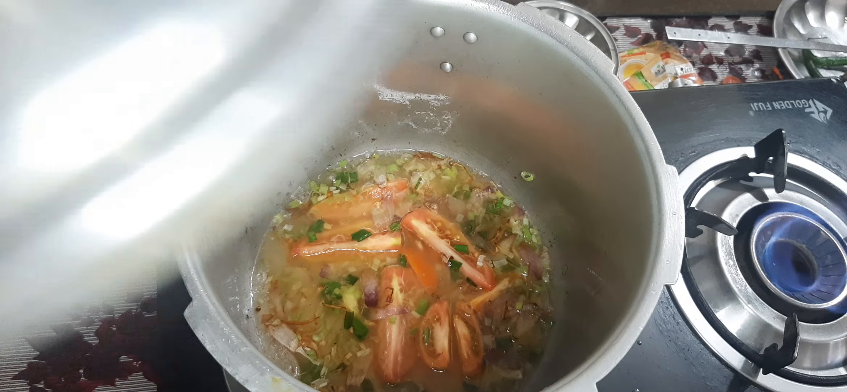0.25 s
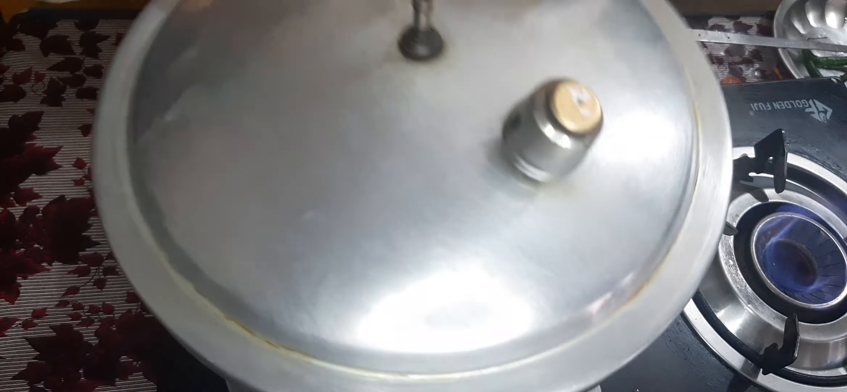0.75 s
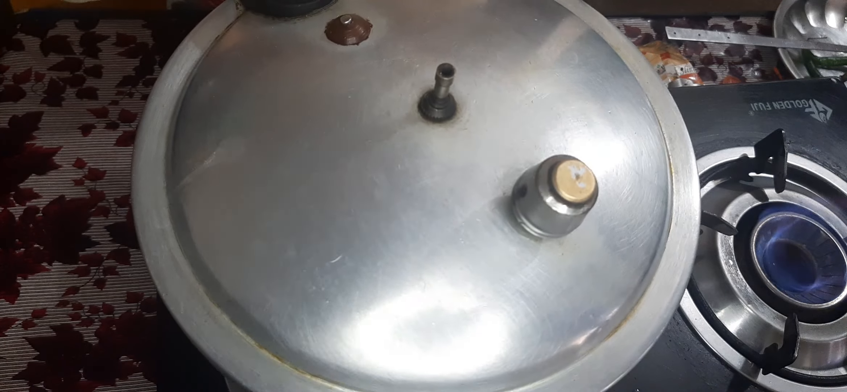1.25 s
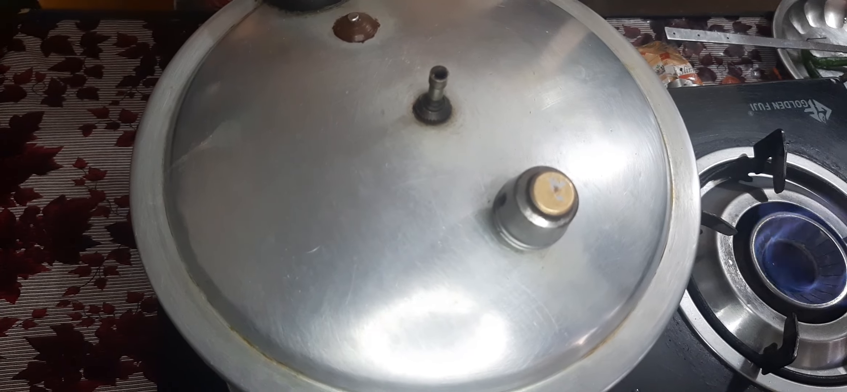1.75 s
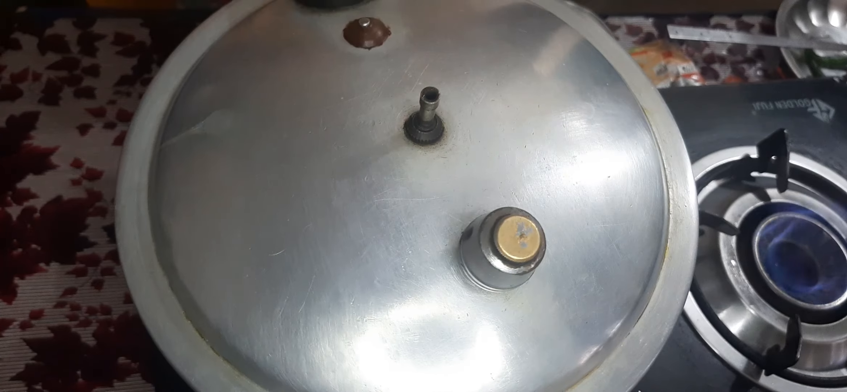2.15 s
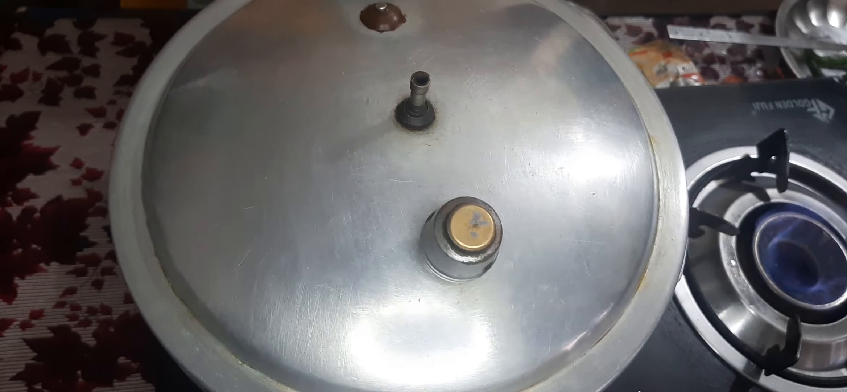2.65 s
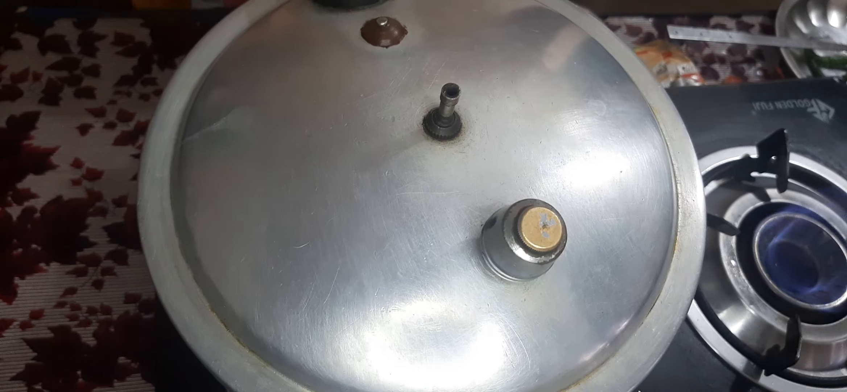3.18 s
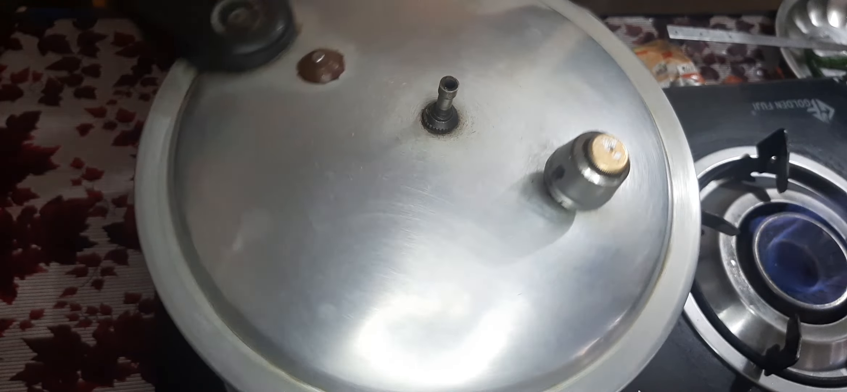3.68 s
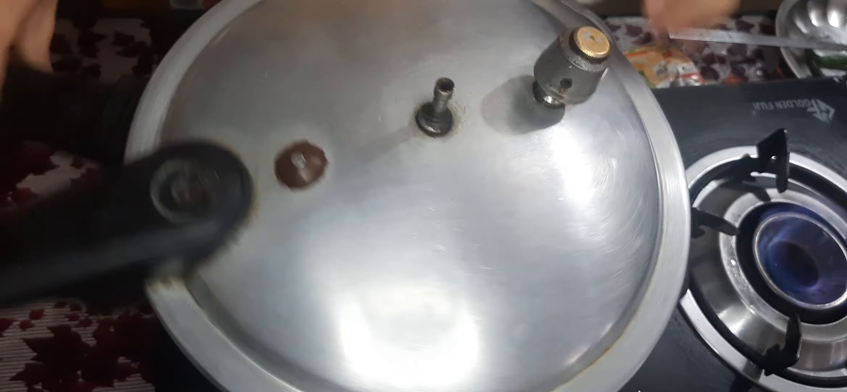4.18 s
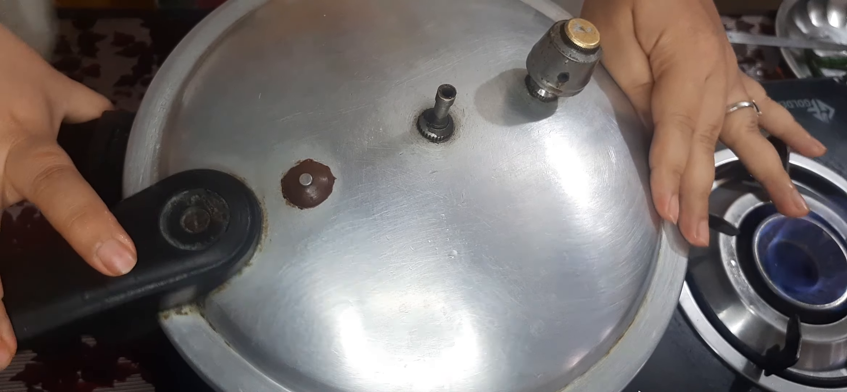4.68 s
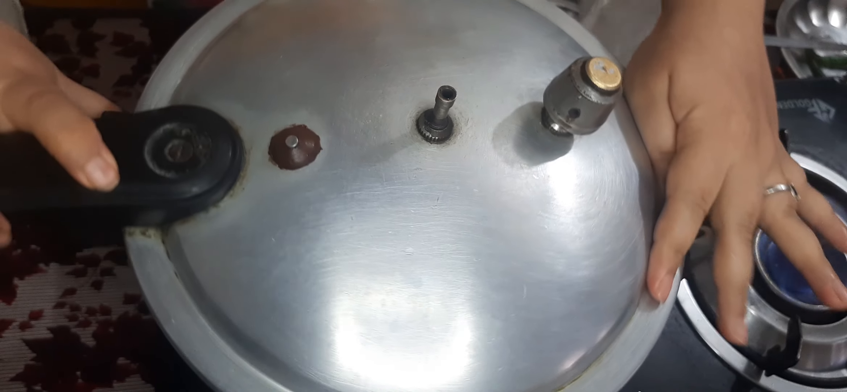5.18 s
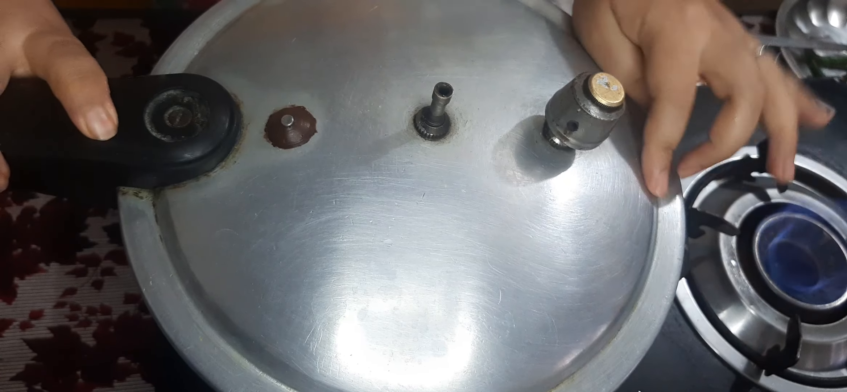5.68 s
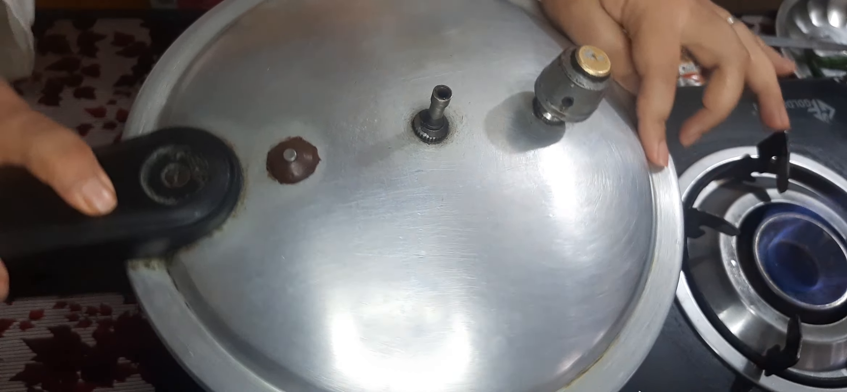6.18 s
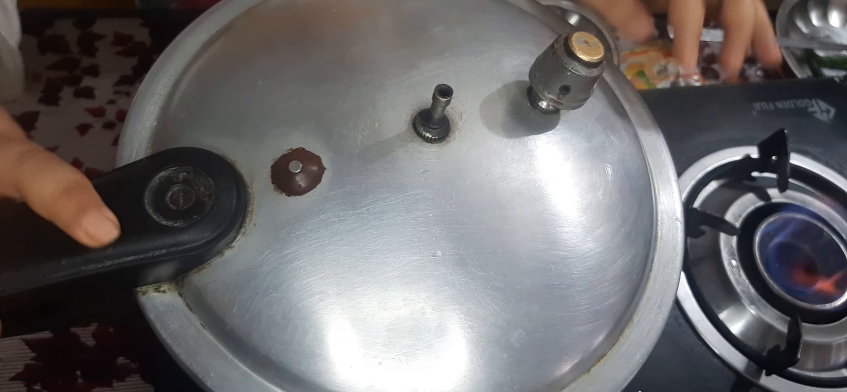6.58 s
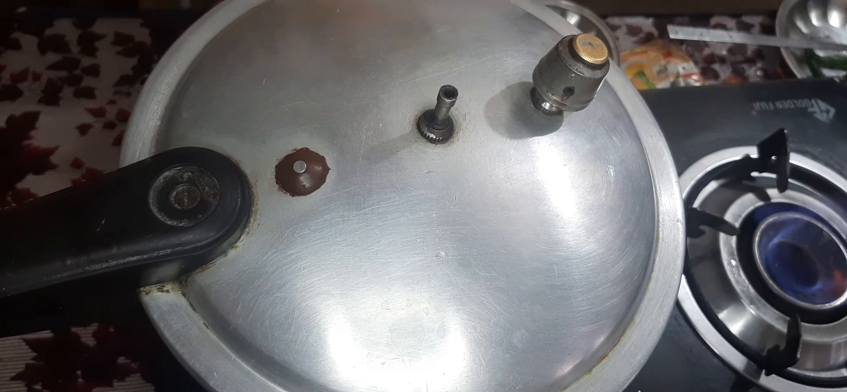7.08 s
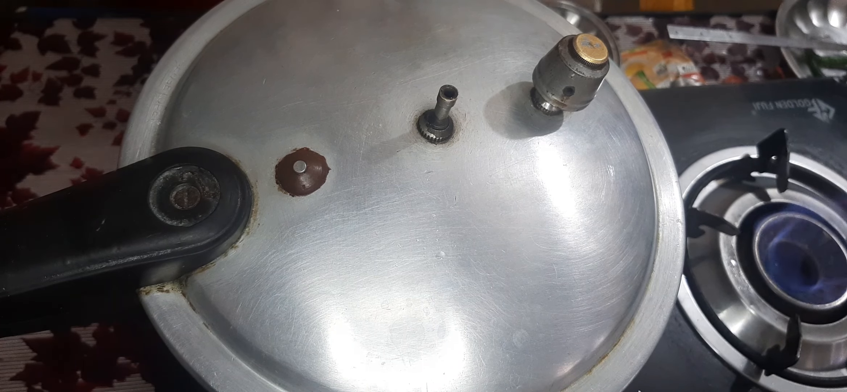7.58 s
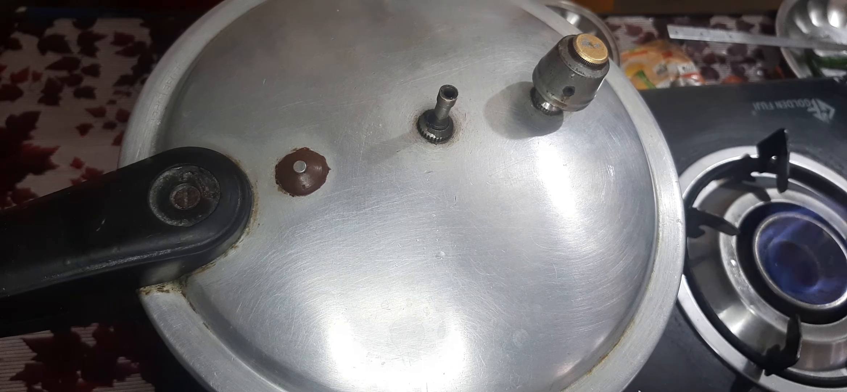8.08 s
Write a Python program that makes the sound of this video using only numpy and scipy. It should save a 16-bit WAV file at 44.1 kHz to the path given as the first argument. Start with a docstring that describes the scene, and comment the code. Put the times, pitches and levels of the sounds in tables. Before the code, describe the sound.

Heavy metal lid set down with ringing knocks, a sharp rattling clank and muffled locking thuds, while a gas burner hisses softly in a small kitchen.

```python
"""The lid of an aluminium pressure cooker is set down, slides and knocks round the rim, drops into the
lugs with a sharp clank and is twisted shut with duller knocks: each blow rings one bank of modes, coloured
by its kind, force and struck spot. Slides and scuffs are swells of coloured noise.
A gas ring hisses and rumbles throughout (steady noise, partly through narrow resonances).
A sleeve brushes past now and then, mostly near the end; a small kitchen adds a short tail."""
import sys
import numpy as np
from scipy import signal
from scipy.fft import rfft, irfft, next_fast_len
from scipy.io import wavfile

SR = 44100
rng = np.random.default_rng(int(sys.argv[2]) if len(sys.argv) > 2 else 0)


def bounce(signal):
    """Save signal as a 16-bit WAV file at the path given by the first command-line argument."""
    frames = np.transpose(np.atleast_2d(signal))
    limited = np.clip(frames, -1, 1)
    pcm = np.round(limited * 32767).astype(np.int16)
    wavfile.write(sys.argv[1], SR, pcm)


N = 367785
TIME_S = np.arange(N) / SR
RING_TIME_S = np.arange(2 ** 15) / SR


def from_db(db):
    """Decibels to gain."""
    return 10 ** (np.asarray(db) / 20)


def rms_one(x):
    """Scale to unit power."""
    return x / np.sqrt(np.mean(x ** 2) + 1e-20)


def at_hz(points, hz):
    """Read a table on a log-frequency axis."""
    known_hz, values = np.transpose(points)
    return np.interp(np.log(np.maximum(hz, 1)), np.log(known_hz), values)


def add(out, sound, start_s):
    """Mix a sound in from a given time."""
    start = max(round(start_s * SR), 0)
    out[:, start:start + sound.shape[1]] += sound[:, :N - start]


def diffuse_noise(spectrum, size):
    """Stereo noise of a given colour; the two sides are most alike in the bass."""
    # left-right likeness of diffuse sound: hz, likeness (0-1)
    likeness = [(60, 0.88), (260, 0.74), (520, 0.64), (1200, 0.13), (2500, 0.25), (14000, 0)]
    hz = np.arange(size // 2 + 1) * SR / size
    alike = np.clip(at_hz(likeness, hz), 0, 1)
    mid, side = rfft(rng.standard_normal((2, size)))
    common = np.sqrt((1 + alike) / 2) * mid
    opposed = np.sqrt((1 - alike) / 2) * side * np.array([[1], [-1]])
    return irfft((common + opposed) * from_db(at_hz(spectrum, hz)), size)


def steady_noise(spectrum):
    """Diffuse noise for the whole scene, unit power."""
    return rms_one(diffuse_noise(spectrum, size=next_fast_len(N, True))[:, :N])


def causal_filter(x, gain_db):
    """Minimum-phase filter from one gain per frequency bin: nothing sounds early."""
    cepstrum = irfft(np.log(from_db(gain_db)))
    half = len(cepstrum) // 2
    cepstrum[1:half] *= 2
    cepstrum[half + 1:] = 0
    return irfft(rfft(x) * np.exp(rfft(cepstrum)))


def decay(t60_s):
    """An envelope that falls 60 dB in t60_s."""
    return from_db(-60 * RING_TIME_S / t60_s)


def ring(hz, level_db, t60_s):
    """One decaying vibration."""
    return from_db(level_db) * decay(t60_s) * np.sin(2 * np.pi * hz * RING_TIME_S)


def flame_ports():
    """Turbulence at the burner, ringing in narrow resonances under the pot."""
    # resonances that colour the flame's hiss: hz, width_hz, relative_db
    ports = [(1091, 55, -8.5), (1233, 46, -15.5), (1274, 69, 1.5), (1503, 230, -10), (1833, 20, 0.5),
             (1983, 33, -2), (2350, 340, -12.5), (2924, 69, -8), (3042, 16.5, -2)]
    out = 0
    noise = steady_noise([(300, 0), (4000, 0)])  # white
    for k, (hz, width_hz, db) in enumerate(ports):
        radius = np.exp(-np.pi * width_hz / SR)
        poles = [1, -2 * radius * np.cos(2 * np.pi * hz / SR), radius * radius]
        gain = from_db(db) * (1 - radius * radius) / 2
        # offset by k seconds, so the resonances are fed independently
        feed = np.roll(noise, k * SR, axis=1)
        out = out + gain * signal.lfilter([1, 0, -1], poles, feed)
    return rms_one(out)


def burner():
    """Gas hisses through the jet, sings in the ports and burns with a low rumble; all swell together."""
    # common level of the three voices: time_s, level_db
    level_points = [(0.0, -48.5), (0.63, -49.5), (1.58, -52.5), (2.79, -51), (3.6, -54), (5.06, -50),
                    (7.76, -50), (8.34, -50.5)]
    # spectra of jet hiss and combustion rumble: hz, relative_db
    jet_spectrum = [(1500, -7), (2600, -6.5), (3600, -3), (5000, 1.5), (6200, 1.5), (6700, 7), (7400, 7),
                    (7900, 3.5), (8500, -3.5), (11500, -5.5), (14000, -1), (16000, -1.5)]
    rumble_spectrum = [(20, -16), (45, -7), (70, -7), (92, 4.5), (120, 0), (160, -3.5), (250, -3),
                       (400, -7), (600, -11.5), (900, -15.5), (2000, -15), (6000, -29)]
    jet_db, port_db, rumble_db = 5.5, 3, 0  # against the common level
    left_lag_samples = 6  # the burner is to the right
    level = from_db(np.interp(TIME_S, *np.transpose(level_points)))
    hiss = from_db(jet_db) * steady_noise(jet_spectrum)
    flame = from_db(port_db) * flame_ports()
    rumble = from_db(rumble_db) * steady_noise(rumble_spectrum)
    left, right = level * (hiss + flame + rumble)
    return np.array([np.roll(left, left_lag_samples), right])


def rubbing(strokes, spectrum):
    """Friction noise that swells and fades with each stroke."""
    swell = sum(from_db(db) * np.exp(-((TIME_S - mid_s) / half_s) ** 2) for mid_s, half_s, db in strokes)
    return swell * steady_noise(spectrum)


def sleeve_brushes():
    """Cloth friction: soft swells of mostly bright noise."""
    # strokes of the sleeve: middle_s, half_length_s, level_db
    brushes = [(.2, 0.048, -48), (5.894, 0.025, -47), (6.925, 0.11, -44), (7.305, 0.052, -48.5),
               (7.625, 0.038, -39), (7.786, 0.038, -44)]
    # cloth noise: hz, relative_db
    sleeve_spectrum = [(100, -11), (450, -31), (900, -0.5), (2200, 6), (4500, 5), (7500, 2), (9000, -6),
                       (16000, -10)]
    return rubbing(brushes, sleeve_spectrum)


def hand_scuffs():
    """Skin friction on the lid and its handle: swells of noise centred in the low mids."""
    # strokes of the hands: middle_s, half_length_s, level_db
    scuffs = [(.2, 0.27, -48.5), (1.22, 0.072, -34.5), (1.66, 0.066, -46.5), (5.0, 0.028, -47.5),
              (4.19, 0.022, -45), (6.93, 0.11, -48.5)]
    # scuff noise: hz, relative_db
    scuff_spectrum = [(120, -13), (300, -2), (430, 5.5), (650, 0), (1000, -9), (4000, -46)]
    return rubbing(scuffs, scuff_spectrum)


def rim_slides():
    """The rim slides on the pot: low groaning friction noise."""
    # strokes of the rim: middle_s, half_length_s, level_db
    slides = [(1.77, 0.084, -44.5), (2.07, 0.072, -38.5), (2.33, 0.045, -42.5), (2.42, 0.089, -45),
              (2.66, 0.052, -53), (2.92, 0.051, -34), (3.36, 0.028, -51), (3.83, 0.02, -41.5),
              (5.88, 0.077, -48), (6.76, 0.062, -40.5)]
    # groan of the sliding rim: hz, relative_db
    groan_spectrum = [(50, -5), (100, -5), (125, -37), (160, 9.5), (210, -4), (330, -9.5), (500, -11),
                      (900, -17), (3000, -37)]
    return rubbing(slides, groan_spectrum)


def crack(contact_db):
    """The contact itself and its first reflections, which reach the two sides at different times."""
    # reflections from hob, wall and cabinet: left_delay_s, right_delay_s, relative_db
    echoes = [(.0012, 0.001, 4.5), (.0026, 0.0025, -17), (.0051, .0044, -5), (.0083, .0091, -32)]
    out = np.zeros((2, len(RING_TIME_S)))
    out[:, 0] = 1
    for k, (left_s, right_s, db) in enumerate(echoes):
        polarity = (-1) ** (k + 1)
        out[[0, 1], [round(left_s * SR), round(right_s * SR)]] += from_db(db) * polarity
    return from_db(contact_db) * out


def wash(fades, sheet_db, sheet_t60_s, room_db):
    """Countless short-lived modes of the sheet metal as noise, plus the kitchen's tail, band by band."""
    noise = diffuse_noise([(1, 0), (2, 0.01)], size=len(RING_TIME_S))  # practically flat
    spectrum = rfft(noise)
    tail = sum(irfft(spectrum * band) * fade for band, fade in fades)
    return from_db(sheet_db) * noise * decay(sheet_t60_s) + from_db(room_db) * tail


def blow_colour(hz, clank_db, low_db, body_db, edge_db, bite_hz, bite_db, bite_octaves=0.23):
    """Spectrum of one blow in dB: the edge brightens with force, the struck spot adds a peak (rim bite)."""
    # colour common to all contacts: hz, relative_db
    contact = [(35, -40), (70, -9), (110, 9), (200, 7.5), (340, 12), (500, 5.5), (850, 4), (1250, 0.5),
               (2250, 0.5), (2650, -3), (3500, 1), (7200, -5.5), (8600, -21.5), (15500, -20)]
    # a harder blow has a shorter contact: extra dB of edge per dB above a firm blow
    firm_blow_db, edge_per_db = -14.5, 0.11
    top_db = clank_db + edge_db + edge_per_db * (clank_db - firm_blow_db)
    points = [(170, low_db), (480, body_db), (900, clank_db), (1350, clank_db), (3600, top_db)]
    broad_db = at_hz(points, hz)
    octaves = np.log2(np.maximum(hz, 1) / bite_hz)
    peak = from_db(bite_db) * np.exp(-(octaves / bite_octaves) ** 2)
    return 20 * np.log10(np.hypot(from_db(broad_db), peak)) + at_hz(contact, hz)


def landings(hz):
    """The lid lands and rocks on the rim; its flexing pitch varies with its support."""
    # start_s, clank_db, thump_db, thump_hz, bite_hz, bite_db
    landing_blows = [(1.117, -12, -16, 224, 1040, -9), (1.127, -21, -20, 240, 348, -25),
                     (1.178, -23, -23, 218, 1550, -18), (1.261, -30.5, -24, 222, 1030, -20.5),
                     (1.997, -32.5, -27, 262, 423, -19.5), (2.107, -20, -16.5, 180, 700, -23),
                     (2.135, -22.5, -22, 182, 1650, -23), (2.158, -11.5, -22.5, 190, 1090, -25),
                     (2.467, -15.5, -28, 215, 1070, -32), (2.576, -22.5, -19.5, 180, 600, -28),
                     (2.844, -35, -27.5, 236, 900, -28), (2.854, -23.5, -26, 231, 1070, -18),
                     (2.872, -37, -34, 157, 600, -29)]
    for start_s, clank_db, thump_db, thump_hz, bite_hz, bite_db in landing_blows:
        body_db = (clank_db + thump_db) / 2 - 3
        colour_db = blow_colour(hz, clank_db, thump_db, body_db, -8, bite_hz, bite_db)
        yield start_s, colour_db, thump_db, thump_hz


def clashes(hz):
    """Bare metal edges clash with a wide rim bite, loudest as the lid drops into the lugs."""
    # start_s, clank_db, thump_db, bite_hz
    clash_blows = [(.183, -35, -61, 2330), (2.957, -14, -24.5, 5500), (3.025, -14.5, -28.5, 2920),
                   (3.030, -13.5, -18.5, 5700), (3.040, -16, -32.5, 2000), (3.057, -15, -43, 5900),
                   (3.069, -18.5, -40, 6000), (3.102, -24.5, -37, 1280), (3.295, -30, -41, 4900),
                   (4.736, -30, -53, 3580)]
    loose_lid_hz = 309.6
    body_db, edge_db, bite_db = -3, -3, 1.5  # against the clank
    for start_s, clank_db, thump_db, bite_hz in clash_blows:
        colour_db = blow_colour(hz, clank_db, thump_db, clank_db + body_db, edge_db,
                                bite_hz, clank_db + bite_db, bite_octaves=0.46)
        yield start_s, colour_db, thump_db, loose_lid_hz


def gasket_knocks(hz):
    """The lid, twisted shut, knocks through its gasket; the rubber muffles the treble."""
    # start_s, clank_db, thump_db, body_db, bite_hz
    knock_blows = [(3.295, -53, -30.5, -40.5, 1100), (3.572, -37, -38.5, -34.5, 966),
                   (3.79, -39, -40, -34.5, 1135), (3.886, -35.5, -38.5, -43, 946),
                   (4.092, -40, -43, -51, 1230), (4.131, -40, -40, -31.5, 1200),
                   (4.205, -23, -35, -36, 1170), (4.212, -30.5, -41, -37, 1870),
                   (4.230, -23.5, -28, -26, 1160), (4.723, -24.5, -30.5, -19.5, 760),
                   (4.736, -24.5, -31, -29, 1360), (5.570, -30, -39, -36.5, 1150),
                   (5.778, -28.5, -33.5, -39.5, 990), (6.322, -35.5, -37, -48, 1030),
                   (6.569, -35, -30.5, -45, 1110), (6.66, -30.5, -30.5, -36, 946),
                   (6.700, -24.5, -37.5, -32, 1315)]
    seated_lid_hz, gasket_hz = 103.9, 2670
    edge_db, bite_db = -11.5, 8.5  # against the clank
    gasket_db = -10 * np.log10(1 + (hz / gasket_hz) ** 6)
    for start_s, clank_db, thump_db, body_db, bite_hz in knock_blows:
        colour_db = blow_colour(hz, clank_db, thump_db, body_db, edge_db, bite_hz, clank_db + bite_db)
        yield start_s, colour_db + gasket_db, thump_db, seated_lid_hz


def bumps(hz):
    """Soft bumps that mainly flex the lid."""
    # start_s, thump_db
    bump_blows = [(.572, -39.5), (1.610, -37.5), (1.673, -36.5), (1.935, -40), (2.369, -37.5),
                  (2.406, -34.5), (4.001, -39), (4.041, -42), (4.968, -36), (5.003, -37.5), (5.835, -39)]
    bump_hz, bite_hz = 160, 600
    for start_s, thump_db in bump_blows:
        clank_db, body_db = thump_db - 6, thump_db - 5
        colour_db = blow_colour(hz, clank_db, thump_db, body_db, -6, bite_hz, bite_db=clank_db)
        yield start_s, colour_db, thump_db, bump_hz


def blows(hz):
    """Every contact as (start_s, colour_db, thump_db, thump_hz)."""
    for kind in (landings, clashes, gasket_knocks, bumps):
        yield from kind(hz)


def lid(modes_db, thump_t60_s, spread_db, build_s):
    """Every blow rings the same cooker; its kind, its force and the struck spot set its colour."""
    # ringing of lid and pot: hz, relative_db, t60_s
    cooker_modes = [(96.5, -4.5, 0.18), (154.8, -6, 0.51), (180, -7, 0.28), (231, -2.5, 0.32),
                    (287.5, -1, 0.34), (410, -8.5, 0.4), (478, -17, 0.13), (574, -15.5, 0.46),
                    (627.5, 0, 0.27), (700, -4.5, 0.21), (802, -26, 0.59), (1030, 1, 0.28),
                    (1071, 5.5, 0.026), (1142, 9, 0.051), (1280, -13, 0.1), (1311, 6.5, 0.12),
                    (1475, -3, 0.22), (1680, -11, 0.17), (1820, 0, 0.33), (2207, -0.5, 0.13),
                    (2350, -3, 0.16), (3300, -8, 0.36), (3410, -29, 0.17), (3420, 5.5, 0.16),
                    (3950, 0, 0.14), (4400, -8, 0.12), (5120, 3.5, 0.11), (5170, -5, 0.11),
                    (5350, -5, 0.11), (5450, -4, 0.21)]
    # dying away of the kitchen: hz, t60_s
    kitchen = [(100, 0.81), (250, 0.42), (700, 0.26), (2000, 0.28), (6000, 0.26), (14000, 0.18)]
    out = np.zeros((2, N))
    hz = np.fft.rfftfreq(len(RING_TIME_S), 1 / SR)
    build_up = 1 - np.exp(-RING_TIME_S / build_s)
    fades = []
    for centre_hz, t60_s in kitchen:
        band = at_hz([(f, f == centre_hz) for f, _ in kitchen], hz)
        fades.append((band, decay(t60_s) * build_up))
    rings = np.array([ring(*mode) for mode in cooker_modes])
    high = np.array(cooker_modes)[:, 0] > 1300
    for start_s, colour_db, thump_db, thump_hz in blows(hz):
        # each blow feeds the modes unevenly; high modes reach the two sides with unrelated signs
        strengths = from_db(modes_db + spread_db * rng.standard_normal(len(rings)))
        signs = np.where(high, rng.choice([-1, 1], (2, len(rings))), 1)
        metal = (strengths * signs) @ rings + crack(contact_db=19.0)
        metal = metal + wash(fades, sheet_db=7.0, sheet_t60_s=0.027, room_db=-1.0)
        # the lid flexes as a whole, at a pitch set by how it is held and supported
        thump = ring(thump_hz, thump_db, thump_t60_s)
        add(out, causal_filter(metal, colour_db) + thump, start_s)
    return out


def scene():
    """Burner, sleeve, hands, sliding rim and ringing lid together."""
    background = burner() + sleeve_brushes()
    handling = hand_scuffs() + rim_slides()
    return background + handling + lid(modes_db=-19.5, thump_t60_s=0.19, spread_db=3.5, build_s=0.0081)


def record(dry):
    """Two small microphones, thin in the deep bass; peaks are held at full scale and the top is cut."""
    # the left microphone is nearer the pot: hz, left_minus_right_db
    balance = [(70, 10), (150, 4.5), (300, 3.5), (700, 3), (2800, 1.5), (5500, 2.5), (8000, -0.2),
               (15000, -1.2)]
    bass_cut_hz, top_cut_hz = 58.0, 16050
    size = next_fast_len(N, True)
    left_db = at_hz(balance, np.fft.rfftfreq(size, 1 / SR))
    heard = irfft(rfft(dry, size) * from_db([left_db / 2, -left_db / 2]), size)[:, :N]
    heard = signal.sosfilt(signal.butter(3, bass_cut_hz, "high", fs=SR, output="sos"), heard)
    held = np.clip(heard, -1, 1)
    return signal.sosfilt(signal.ellip(12, .1, 80, top_cut_hz, fs=SR, output="sos"), held)


dry = scene()
out = record(dry)
bounce(out)
```